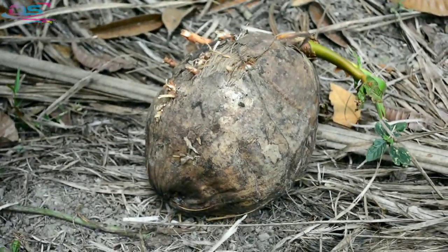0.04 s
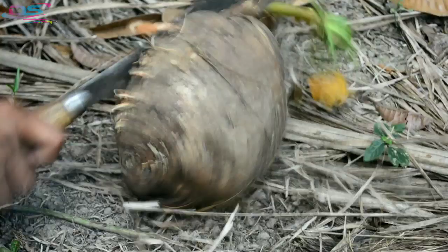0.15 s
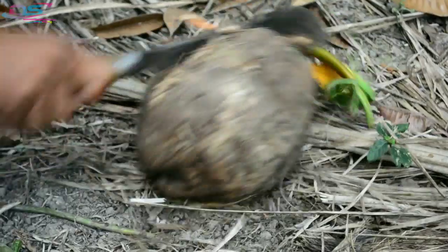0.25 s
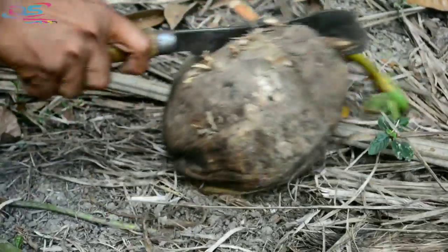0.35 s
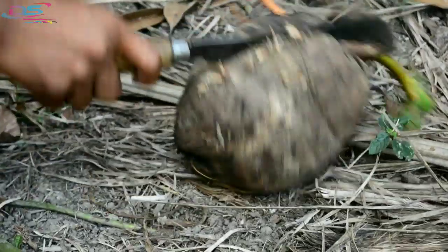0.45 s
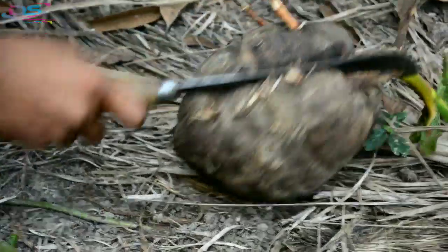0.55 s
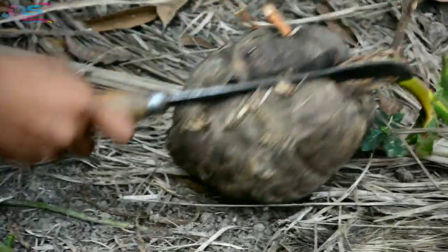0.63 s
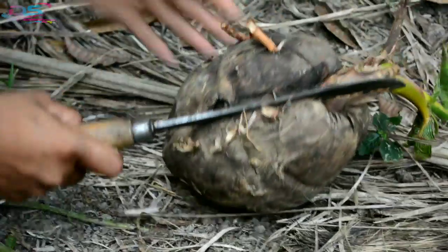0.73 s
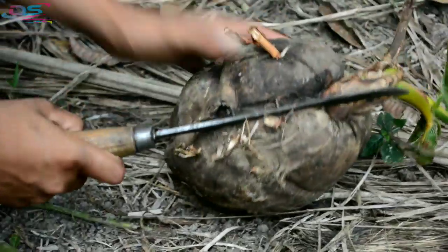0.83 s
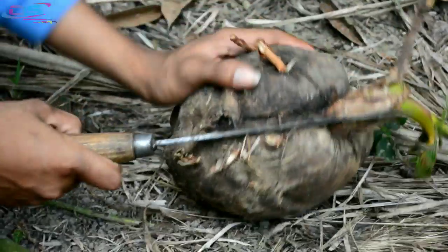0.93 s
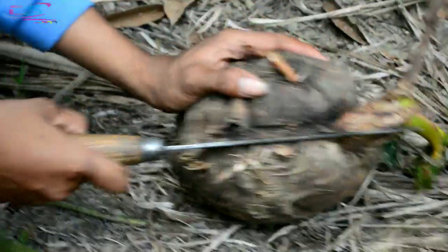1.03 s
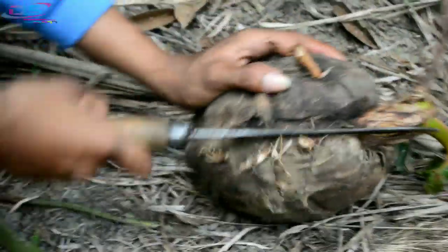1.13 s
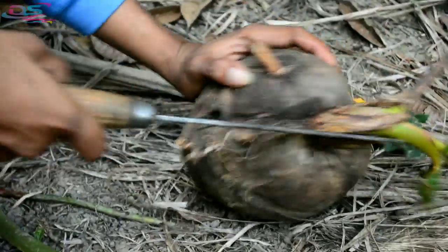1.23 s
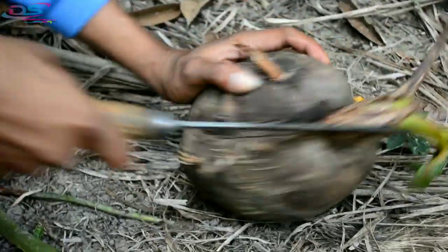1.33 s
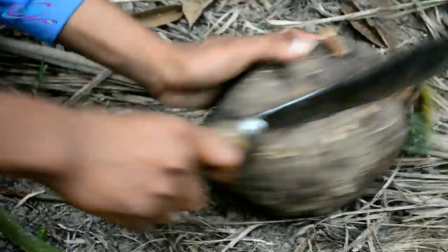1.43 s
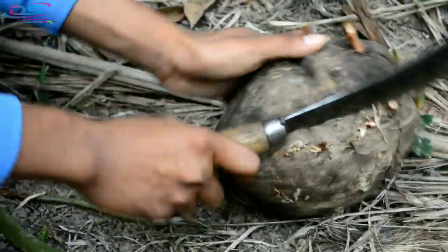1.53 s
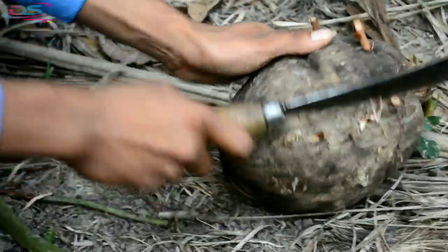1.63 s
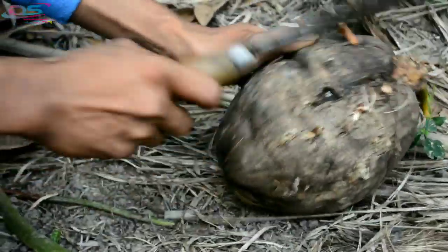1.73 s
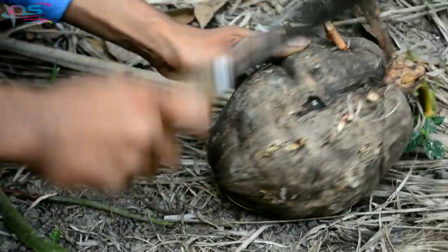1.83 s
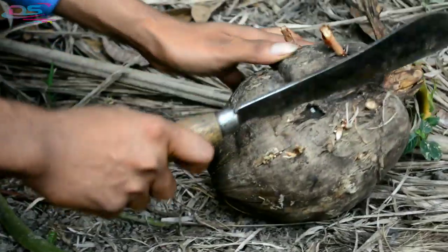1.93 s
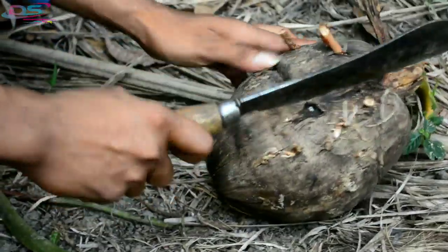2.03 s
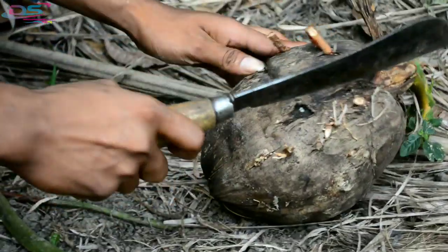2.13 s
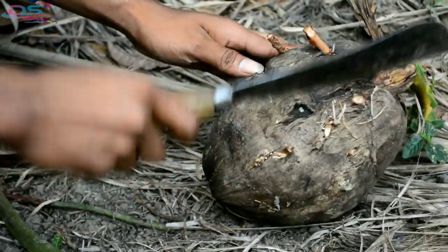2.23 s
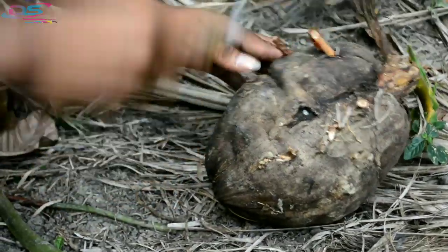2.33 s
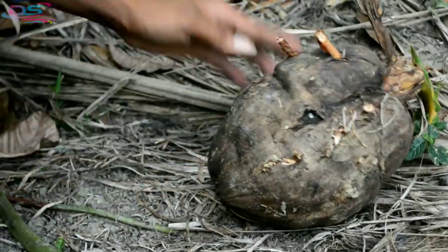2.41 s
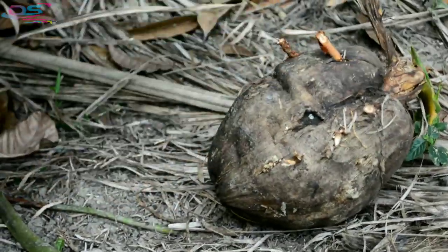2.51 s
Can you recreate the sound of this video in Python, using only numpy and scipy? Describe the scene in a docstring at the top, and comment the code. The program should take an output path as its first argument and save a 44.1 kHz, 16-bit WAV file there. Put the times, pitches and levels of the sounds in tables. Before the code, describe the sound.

Close up on leaf litter outdoors: small snaps, one very loud hollow chop into a coconut, fading leafy scrape, a cluster of dry cracks, a much softer blade tap, then near quiet with faint insect-like hiss.

```python
"""A quiet rural floor with an insect-like hiss (sliding noise band), then a machete bites into a dry coconut husk.
The microphone lies close by on leaf litter: breaking fibres ring the husk's modes over a gliding cleft tone.
The nut rolls and scrapes through dry leaves (coloured grains) and twigs snap (click, body, tail).
The blade, worked loose, sings faintly (one high mode) and taps again. The hard chop overloads the input."""
import sys
import numpy as np
from scipy import signal
from scipy.fft import rfft, irfft, next_fast_len
from scipy.io import wavfile
from scipy.ndimage import uniform_filter1d

SR = 44100
rng = np.random.default_rng(int(sys.argv[2]) if len(sys.argv) > 2 else 0)


def dump(signal):
    """Clip the signal to [-1, 1] and save it as 16-bit WAV at the path in sys.argv[1]."""
    limited = np.clip(np.atleast_2d(signal).T, -1, 1)
    pcm = np.round(limited * 32767).astype(np.int16)
    wavfile.write(sys.argv[1], SR, pcm)


def linear_from_db(decibels):
    """Turn decibels (scalar or array-like) into linear amplitude factors; 0 gives 1."""
    return 10 ** (np.asarray(decibels, float) / 20)


N = 114660
T = np.arange(N) / SR

# spectrum of a sharp click or crack: freq_hz, level_db
CLICK_SPECTRUM = [(1200, -17), (2800, 1), (5000, 1), (8000, 0), (13000, -8.5)]


def colour(x, points, unit=True):
    """Filter by (Hz, dB) points, 20 dB lower beyond either end; rms 1 unless unit is off."""
    points, size = np.array(points, float), next_fast_len(len(x) + 4096)
    log_hz = np.log(np.arange(size // 2 + 1) * SR / size + 1)
    below, above = points[0, 1] - 20, points[-1, 1] - 20
    gain_db = np.interp(log_hz, np.log(points[:, 0]), points[:, 1], below, above)
    y = irfft(rfft(x, size) * linear_from_db(gain_db), size)[:len(x)]
    return y / y.std() if unit else y


def decay(t, t60):
    """Exponential fade by 60 dB in t60 seconds."""
    return 1000. ** (-t / t60)


def ring(hz, t60, size=6000):
    """One resonant mode: a sine with exponential decay."""
    t = np.arange(size) / SR
    return np.sin(2 * np.pi * hz * t) * decay(t, t60)


def add(out, s, x):
    """Mix x in at time s."""
    i = int(s * SR)
    out[i:i + len(x)] += x[:len(out) - i]


def walk(rate):
    """Random wander of spread 1: noise averaged twice over 1 / rate seconds."""
    span = int(SR / rate)
    w = uniform_filter1d(uniform_filter1d(rng.standard_normal(N), span), span)
    return w / w.std()


def distant_air():
    """The quiet floor: wavering noise in the middle and a steady, separate noise at the sides."""
    # spectrum of the floor in the middle: freq_hz, level_db (per Hz)
    mid_spectrum = [(18, -47), (30, -28), (103, -3.5), (423, -6), (715, -4), (1010, -4.5), (1570, -5.5),
                    (4030, -14), (7560, -18), (14600, -30), (15800, -35.5)]
    # spectrum of the floor at the sides: freq_hz, level_db (per Hz)
    side_spectrum = [(18, -49), (30, -22.5), (152, -14), (226, -7), (522, -2), (1270, -2), (8620, -16.5),
                     (11500, -22.5), (15800, -29)]
    mid = linear_from_db(-57 + 1.1 * walk(9)) * colour(rng.standard_normal(N), mid_spectrum)
    side = linear_from_db(-61.5) * colour(rng.standard_normal(N), side_spectrum)
    return mid, side


def insect():
    """Narrow hiss, perhaps an insect: slow noise carried on a tone that slides in pitch and comes in patches."""
    # course of the hiss: time_s, pitch_hz, level_db (before the patches)
    course = [(0, 5836, -59), (.14, 5680, -64.5), (0.19, 5650, -67.5), (0.671, 5666, -80), (.71, 5996, -65),
              (.79, 6001, -56.5), (.87, 6050, -68), (.93, 6170, -93), (1.15, 6464, -100.5),
              (1.189, 6790, -58), (1.25, 7480, -59.5), (1.398, 7920, -60), (1.498, 8460, -59.5),
              (1.629, 8170, -60.5), (1.669, 7570, -61.5), (1.85, 7630, -68), (1.97, 7625, -79),
              (2.048, 7600, -92.5)]
    time_s, pitch_hz, level_db = np.array(course).T
    in_phase, quadrature = walk(650), walk(650)
    phase = 2 * np.pi * np.cumsum(np.interp(T, time_s, pitch_hz)) / SR
    patches_db = 3.0 * walk(25)
    level = linear_from_db(np.interp(T, time_s, level_db, right=-120) + patches_db)
    return level * (in_phase * np.sin(phase) + quadrature * np.cos(phase))


def snaps():
    """Twigs and fibres snap: a bright click, a few cycles of body and a short rustling tail."""
    # snaps: start_s, level_db, body_hz, click_db (relative, before the click's own fade)
    snap_events = [(0.0817, -32.5, 875, 7), (0.401, -31.5, 1530, 3), (0.462, -41.5, 1450, 14.5),
                   (.475, -38, 2270, 5), (0.52, -36.5, 430, -27), (0.602, -38, 403, -8),
                   (0.903, -40.5, 997, -18), (0.924, -41.5, 2240, 4), (1.124, -40, 1070, -15),
                   (1.2243, -28, 1990, -16), (1.3102, -24, 2240, 5), (1.3218, -23.5, 1220, -1),
                   (1.3262, -17, 1750, -0.5), (1.361, -28.5, 2330, -14), (1.385, -33.5, 2300, -12),
                   (1.483, -40, 1520, -12), (1.512, -47, 2900, -8), (1.523, -27, 1770, -12),
                   (1.544, -25.5, 740, -30), (1.562, -38, 1500, -6), (1.586, -36, 594, -12),
                   (1.607, -26.5, 2150, -12), (1.6351, -27.5, 1410, -5), (1.6943, -35.5, 1292, -11.5),
                   (1.731, -46, 1445, -7.5), (1.744, -40.5, 3490, -5), (2.059, -46.5, 3560, 7),
                   (2.2097, -33.5, 4450, -2.5), (2.211, -39.5, 960, -6), (2.507, -45, 1324, 1),
                   (2.582, -42, 1575, 0)]
    body_cycles, min_t60_s, click_t60_s = 8.9, 0.0026, 0.0039
    tail_db, tail_t60_s = -8.5, 0.018
    out, t = np.zeros(N), np.arange(2000) / SR
    tail = linear_from_db(tail_db) * decay(t, tail_t60_s)
    for start_s, level_db, hz, click_db in snap_events:
        noise = rng.standard_normal((2, 2000))
        click = linear_from_db(click_db) * colour(noise[0], CLICK_SPECTRUM) * (0.13 * decay(t, click_t60_s) + tail)
        body = ring(hz, body_cycles / hz + min_t60_s, size=2000)
        body = body * np.minimum(t * hz * 2, 1)  # swells over half a cycle
        rustling = tail * colour(noise[1], [(hz / 2, -15), (hz, 0), (hz * 2, -12)])
        add(out, start_s, linear_from_db(level_db) * (body + rustling + click))
    return out


def rushes():
    """The blade rushes through air before the chop, and later the nut rubs narrowly as it scrapes: narrow noise
    that swells and fades."""
    # rushes: centre_s, half_length_s, centre_hz, level_db
    rush_events = [(.225, .012, 930, -42), (2.139, 0.03, 1880, -49)]
    out = np.zeros(N)
    for centre_s, half_s, hz, level_db in rush_events:
        band = [(hz * 0.61, -20), (hz, 0), (hz * 1.5, -16), (hz * 3, -24)]
        swell = np.exp(-((T - centre_s) / half_s) ** 2)
        out += linear_from_db(level_db) * swell * colour(rng.standard_normal(N), band)
    return out


def husk_body(hollow_db):
    """Modes of the husk with alternating sign, shorter towards the treble; hollow_db weights the mid modes."""
    # modes of the dry husk: freq_hz, level_db
    husk_modes = [(110, -18.5), (200, -13.5), (290, -9), (480, -9.5), (600, -10), (920, -7.5), (1120, -1.5),
                  (1430, -3.5), (1750, -7), (2240, -3.5), (2850, -6), (3320, -1.5), (4450, -17.5),
                  (5650, -18.5), (6420, -9.5), (7600, -22)]
    body = np.zeros(6000)
    for k, (hz, mode_db) in enumerate(husk_modes):
        t60_s = .017 * (1000 / hz) ** .5
        hollow = linear_from_db(hollow_db) if 400 < hz < 1300 else 1
        body += (-1) ** k * linear_from_db(mode_db) * hollow * ring(hz, t60_s)
    return body


def blows():
    """Fibres break one after another while the edge cuts; the husk rings over a cleft tone
    that glides to a settled pitch: down in the hard chop, up in the light tap."""
    # blows: start_s, strength_db, cutting_s, entry_hz (pitch of the cleft), hollow_db (weight on the mid modes)
    blow_events = [(0.2391, 9, .0058, 2322, 6), (1.9955, -8.5, 0.0013, 1330, -3)]
    spring_s, spring_db = 0.0018, -5.5  # second strong break after the first
    cleft_db, open_hz, roughness, rise_s, cleft_t60_s = 1.5, 1695.3, 0.11, .0007, .004
    crack_db, crack_t60_s = -15.5, 0.028
    out, t = np.zeros(N), np.arange(6000) / SR
    for start_s, strength_db, cutting_s, entry_hz, hollow_db in blow_events:
        chance = rng.standard_normal((3, 6000))
        broken = np.abs(chance[1]) < 1800 / SR  # some 1440 fibres a second
        breaks = chance[0] * broken * np.exp(-(t / cutting_s) ** 2) * .5
        breaks[10] += 1
        breaks[10 + int(spring_s * SR)] += linear_from_db(spring_db)
        husk = signal.fftconvolve(breaks, husk_body(hollow_db))[:6000] / 2

        hz = open_hz + (entry_hz - open_hz) * np.exp(-6.5 * t / cutting_s)
        hz = hz * (1 + roughness * colour(chance[0], [(50, 0.0051), (900, 0.0036)]))
        cleft = np.sin(2 * np.pi * np.cumsum(hz) / SR) * np.minimum(t / rise_s, 1)
        cleft = cleft * decay(np.maximum(t - cutting_s, 0), cleft_t60_s)  # held while cutting

        crack_fade = decay(np.maximum(t - cutting_s / 2, 0), crack_t60_s)
        crack = colour(chance[2], CLICK_SPECTRUM) * crack_fade
        add(out, start_s, linear_from_db(strength_db) * (husk + linear_from_db(cleft_db) * cleft + linear_from_db(crack_db) * crack))
    return out


def grains(rate, spectrum):
    """Tiny grains of uneven size, rate per second, over a bed of noise; coloured to rms 1."""
    size = linear_from_db(2 * np.minimum(rng.exponential(size=N), 3)) * rng.standard_normal(N)
    hits = (rng.random(N) < rate / SR) * size
    bed = 1.51 * np.sqrt(rate / SR) * rng.standard_normal(N)
    return colour(hits + bed, spectrum)


def rustle():
    """The nut moves in leaves: the scrape crunches band by band around a moving centre, leaves hiss, the nut thuds."""
    # the nut's moves: time_s, scrape_db (before flutter), leaf_db (relative to scrape),
    # centre_oct (octaves above 1 kHz)
    moves = [(0.249, -16.5, -5, 0.29), (0.263, -25.5, -3, 0.79), (.3, -29.5, -10, 0.9),
             (0.339, -36.5, -5, 0.56), (0.389, -42.5, -3, 0.71), (.45, -47.5, -4.5, 0.59),
             (0.468, -42.5, -1, 0.6), (.6, -48, -0.5, 0.58), (.7, -51.5, -7, 0.43),
             (.89, -56.5, -8, 0.0049), (0.939, -48, -6, 0.73), (1.039, -54.5, -4, 0.83),
             (1.18, -57, -6.5, 0.54), (1.221, -55, 2.5, 0.5), (1.241, -45, -10, 0.99),
             (1.299, -39.5, -2.5, 1.17), (1.33, -52, 3.5, 1), (1.346, -46, -4, 0.39), (1.41, -57, -3, 0.54),
             (1.46, -45.5, -15, 0.84), (1.532, -40, -7.5, 0.95), (1.601, -41.5, -12, 0.73),
             (1.647, -50.5, -0.5, 0.79), (1.659, -61, -2, 0.99), (1.724, -58.5, -8, 0.76),
             (1.739, -44, -11, 0.79), (1.761, -71, -1, 0.51), (1.991, -54.5, -12, 0.88),
             (2.003, -44.5, 0, -1.12), (2.022, -48.5, -1.5, 0.83), (2.071, -52.5, -6.5, 0.67),
             (2.142, -58, -16, 0.65), (2.198, -59.5, -27, 0.62), (2.299, -72, -13.5, -0.002),
             (2.49, -78, -6.5, 0.19), (2.514, -56.5, 4, 0.8), (2.539, -85.5, -12, 0.024),
             (2.6, -57, -5.5, 0.48)]
    # spectrum of the leaf crackle: freq_hz, level_db
    leaf_spectrum = [(3000, -0.5), (4500, 2), (6500, -1), (9000, 1.5), (12000, -9), (15500, -14.5)]
    # spectrum of the nut's thud: freq_hz, level_db
    thud_spectrum = [(90, -7.5), (200, -8.5), (400, -4), (650, 0), (900, -17)]
    grains_per_s, scrape_grains_per_s, width_oct = 5100, 500, 0.74
    crunch_db, flutter_db = 1.5, 1.1
    rows = np.array(moves)
    scrape_db, leaf_db, centre_oct = (np.interp(T, rows[:, 0], rows[:, k]) for k in range(1, 4))

    scrape, power = np.zeros(N), np.zeros(N)
    for octave in np.arange(-1, 2.6, 1 / 3):
        hz = 1000 * 2 ** octave
        share = np.exp(-((octave - centre_oct) / width_oct) ** 2 / 2)
        band = grains(scrape_grains_per_s, [(hz / 1.3, -14), (hz, 0), (hz * 1.5, -14)])
        scrape += share * band * linear_from_db(crunch_db * walk(63))
        power += share ** 2
    scrape = scrape / np.sqrt(power)  # even level wherever the centre lies
    leaves = grains(grains_per_s, leaf_spectrum) * linear_from_db(leaf_db + 1.4 * walk(41))
    thud_db = -4.5 - 13.5 * centre_oct  # stronger when the scrape is low
    thud = grains(grains_per_s, thud_spectrum) * linear_from_db(thud_db + 1.5 * walk(30))
    level = linear_from_db(scrape_db + flutter_db * walk(130)) * (T > rows[0, 0])
    return (scrape + leaves + thud) * level


def blade_rings():
    """The steel sings in one high mode until a touch stops the ring."""
    # rings of the blade: start_s, level_db
    ring_events = [(1.747, -63), (1.997, -45)]
    blade_hz, t60_s, held_s = 11420, .17, .062
    out, t = np.zeros(N), np.arange(6000) / SR
    for start_s, level_db in ring_events:
        add(out, start_s, linear_from_db(level_db) * ring(blade_hz, t60_s) / (1 + (t / held_s) ** 10))
    return out


def scene():
    """Near sounds nearly centred at the microphone, distant air wider."""
    # colour of near sounds at the microphone: freq_hz, level_db
    mic_response = [(25, -15), (100, -1), (250, -0.5), (11000, 0.5), (14000, -4.5), (16500, -20.5)]
    # near sound in the side signal, left minus right: freq_hz, level_db
    port_response = [(60, -17), (500, -27.5), (2500, -32), (6000, -18), (10000, -6), (15000, -21.5)]
    air_mid, air_side = distant_air()
    bug = insect()
    near = snaps() + rushes() + blows() + rustle() + blade_rings()
    near = colour(near, mic_response, unit=False)
    near_side = signal.hilbert(colour(near, port_response, unit=False)).imag  # a quarter cycle late
    mid = near + bug + air_mid
    side = near_side + 0.31 * bug + air_side
    return np.array([mid + side, mid - side])


def low_pass(x):
    """Removes everything above the highest recorded frequency."""
    return signal.sosfilt(signal.butter(12, 15900, fs=SR, output="sos"), x)


def record(dry):
    """The input saturates at a ceiling, as the hard chop does, and the extreme top is cut."""
    ceiling, knee, top_hz = 0.91, 24, 16800  # a higher knee bends more sharply
    x = dry / ceiling
    clipped = ceiling * x / (1 + np.abs(x) ** (2 * knee)) ** (.5 / knee)
    lowpass = signal.butter(8, top_hz, fs=SR, output="sos")
    mix = signal.sosfiltfilt(lowpass, clipped)
    return low_pass(mix)


dry = scene()
out = record(dry)
dump(out)
```